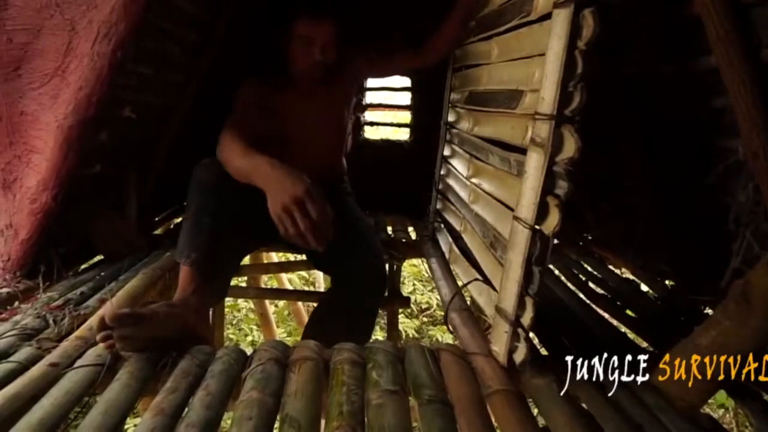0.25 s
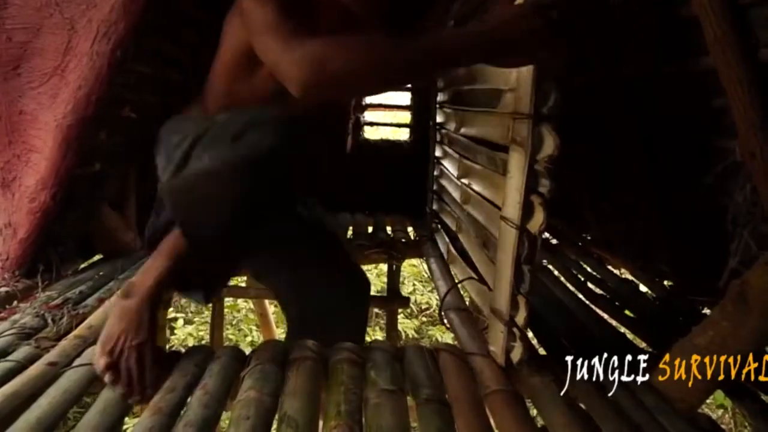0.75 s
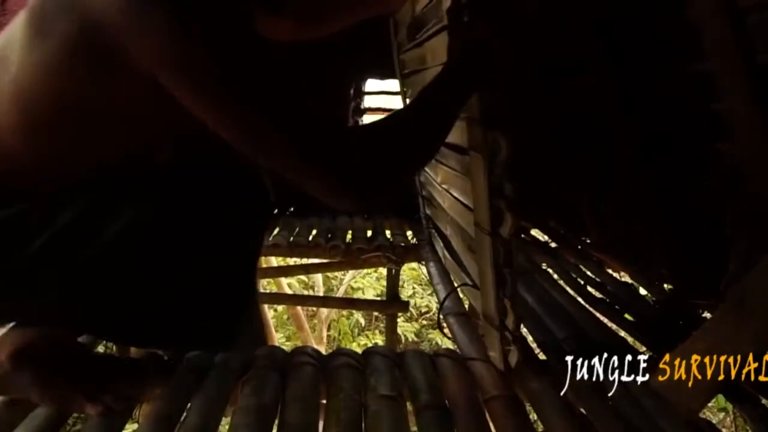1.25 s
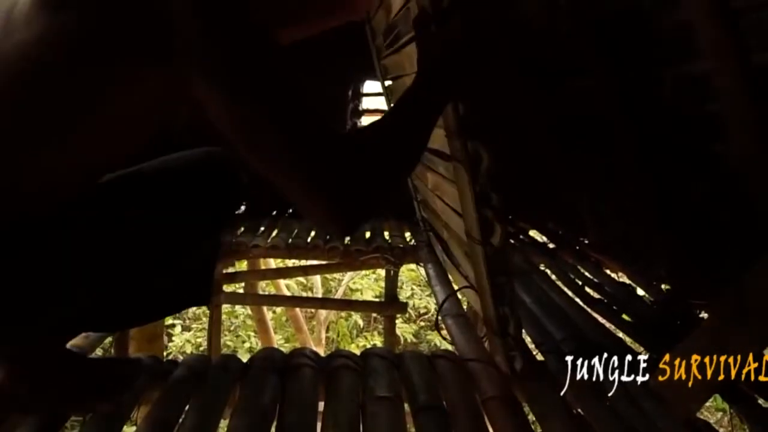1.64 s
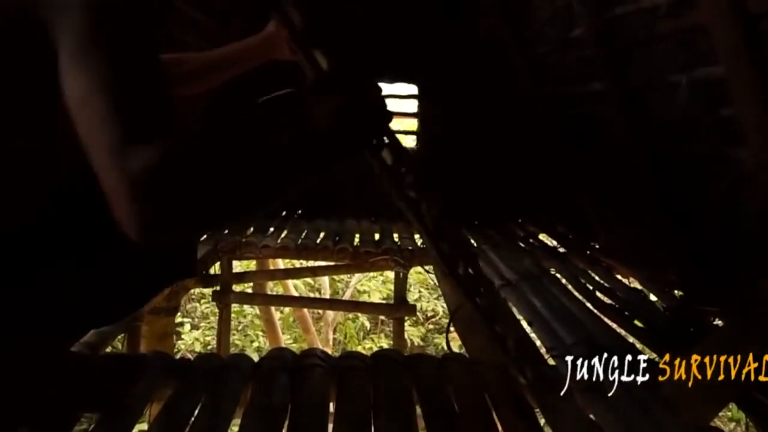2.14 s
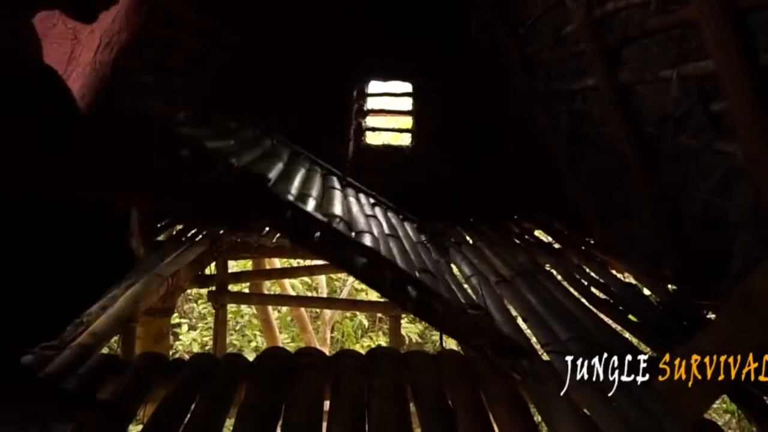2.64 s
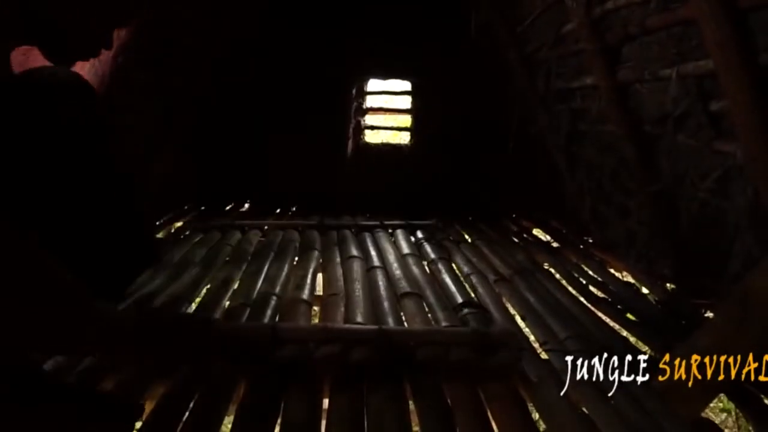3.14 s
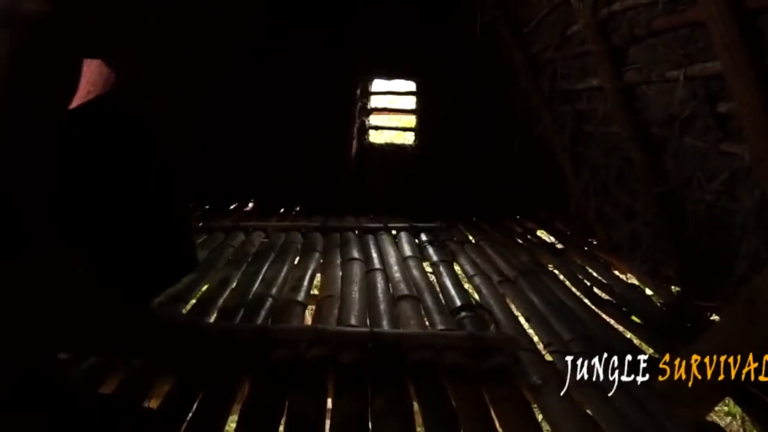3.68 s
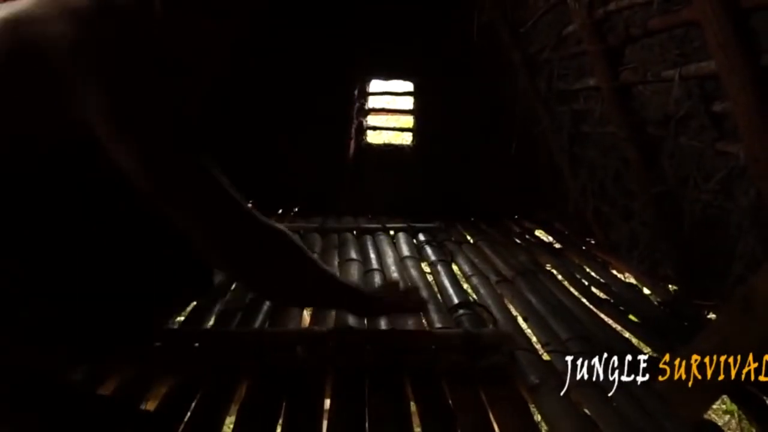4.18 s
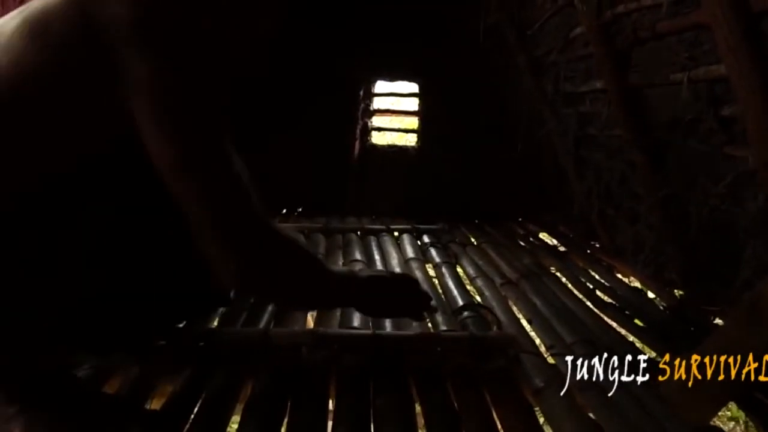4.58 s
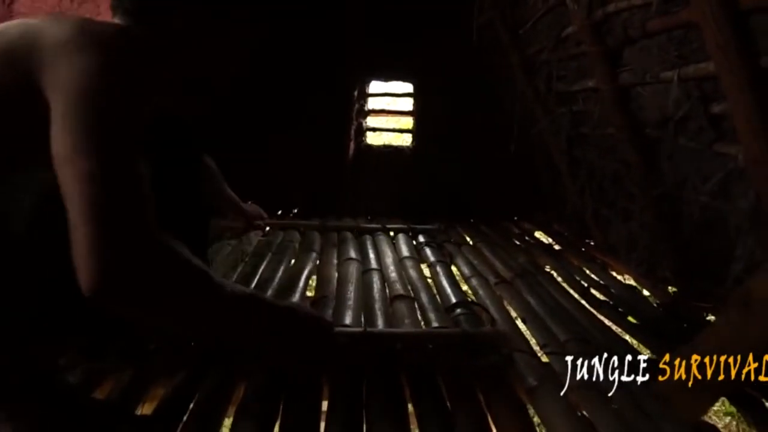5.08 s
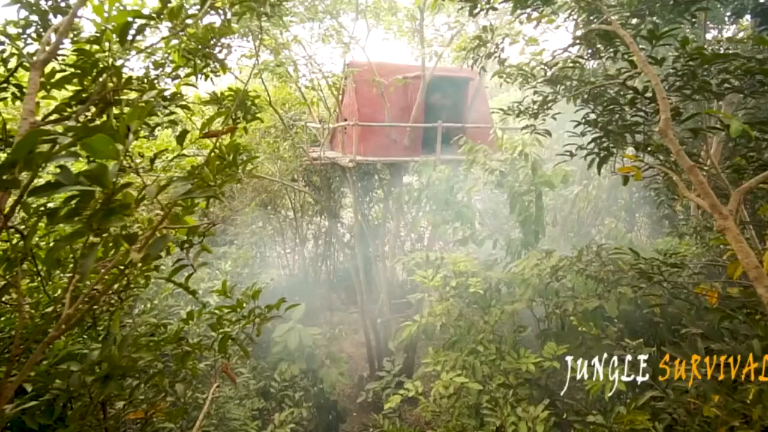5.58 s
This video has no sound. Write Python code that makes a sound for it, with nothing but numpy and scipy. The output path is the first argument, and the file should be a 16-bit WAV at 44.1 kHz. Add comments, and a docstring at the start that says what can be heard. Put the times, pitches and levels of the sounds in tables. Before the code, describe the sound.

Lashed bamboo slats slip and tick against each other, first lightly, then with stronger continuous rubbing as the panel comes down. Three hollow, rattling blows on the poles follow, with soft floor booms; after a short lull come more scrapes and one final hard clatter. The microphone is near, the room tail short and dry, with quiet outdoor hiss and faint early bird whistles.

```python
"""A hatch of lashed bamboo slats is lowered inside a small hut and pressed into a bamboo floor.
Its slats rub, rustle and click (random tiny impacts, filtered by the ringing of bamboo), then
clatter against the poles in four loud knocks (short bursts of impacts). Low pole sounds and soft floor
booms (noise through low, ringing filters) come from feet, a creak and the blows. From outside come a
forest hiss (filtered noise) and faint bird pips (rising sine whistles); the hut adds a short tail."""
import sys
import numpy as np
from scipy import signal
from scipy.fft import rfft, irfft
from scipy.io import wavfile
from scipy.ndimage import uniform_filter1d

SR = 44100
rng = np.random.default_rng(int(sys.argv[2]) if len(sys.argv) > 2 else 0)


def file_out(sig):
    """Save sig as 16-bit WAV at sys.argv[1]."""
    # one column per channel
    cols = np.atleast_2d(sig).T
    # limit, then scale
    lim = np.clip(cols, -1, 1)
    pcm = np.round(lim * 32767).astype(np.int16)
    wavfile.write(sys.argv[1], SR, pcm)


N = 256662  # length in samples
TAPS = 16384  # length of a filter, and of one blow, in samples
HZ = np.fft.rfftfreq(TAPS, 1 / SR)  # the frequencies at which gain curves are drawn

# ways the slat panel likes to ring: [f/Hz, height over the body/dB (before scaling), ring time to -60 dB/s]
PANEL_MODES = [(267, 6, 0.088), (367, 10, 0.15), (430, 7, 0.083), (682, 4, 0.036), (878, 7.5, 0.21),
               (1024, 2.5, 0.032), (1322, 1.5, 0.2), (1575, 2, 0.054), (1790, 2, 0.16), (2026, 5.5, 0.08),
               (2156, 1.5, 0.05), (2310, 4, 0.083), (2567, 6, 0.046), (2735, 6.5, 0.06), (2940, 5.5, 0.073),
               (3130, 3.5, 0.062), (3217, -0.5, 0.033), (3410, -17, 0.089), (3730, 2, 0.15),
               (3960, -3, 0.062)]
# tone of slats slipping past each other: [f/Hz, relative level per Hz/dB]
CLICK_TONE = [(60, -27), (220, -37.5), (420, -19), (900, -8.5), (1500, -4.5), (2500, -2.5), (4000, 1),
              (6500, -6), (10000, -10), (16000, -13.5)]
# stereo width of sounds from straight ahead: [f/Hz, side over mid/dB]
AHEAD = [(60, -50), (150, -38), (380, -20), (950, -11.5), (2380, -8), (5980, -1), (15000, -4)]
# stereo width of sounds from all over the panel: [f/Hz, side over mid/dB]
AROUND = [(100, -8), (250, -9.5), (700, -7.5), (2400, -5.5), (4400, -1), (8000, 0), (15000, -2)]


def amp(db):
    """Turns decibels into a gain."""
    return 10 ** (np.asarray(db) / 20)


def unit(x):
    """Scales a sound to an average (rms) strength of 1."""
    return x / np.sqrt(np.mean(x ** 2) + 1e-20)


def read(points, hz=HZ):
    """Reads a table between its points, on a log-frequency axis."""
    f, value = np.transpose(points)
    return np.interp(np.log(hz + 1), np.log(f + 1), value)


def add(mix, s, sound):
    """Mixes a two-channel sound in at time s."""
    part = mix[:, max(round(s * SR), 0):][:, :sound.shape[1]]
    part += sound[:, :part.shape[1]]


def colour(x, db):
    """Filters with a gain curve, never sounding before its input: sharp peaks ring on after each impact."""
    # folding the cepstrum gives the minimum-phase filter, which responds at once
    cepstrum = irfft(np.maximum(db, db.max() - 100) * np.log(10) / 20)
    cepstrum[1:TAPS // 2] *= 2
    cepstrum[TAPS // 2 + 1:] = 0
    response = irfft(np.exp(rfft(cepstrum)))
    return signal.oaconvolve(x, response[None], axes=1)[:, :x.shape[1]]


def stereo(pair, db, spread=AHEAD):
    """Colours two unrelated signals as mid and side, then scales so that the mid has energy 1."""
    mid = colour(pair[:1], db)[0]
    side = colour(pair[1:], db + read(spread))[0]
    return np.array([mid + side, mid - side]) / np.linalg.norm(mid)


def ring(hz, octaves):
    """Bell-shaped resonance of one struck piece, height 1."""
    return 1 / (1 + (np.log2((HZ + 1) / hz) / octaves) ** 2)


def shelf(hz):
    """Smooth step from 0 below hz to 1 above."""
    return 1 - 1 / (1 + (HZ / hz) ** 6)


def modes_db(modes):
    """Gain curve of a set of ringing modes: the longer the ring, the narrower the peak."""
    power = 1
    for hz, db, t60 in modes:
        half_width = np.log(1000) / (2 * np.pi * t60)  # Hz
        power = power + amp(db) ** 2 / (1 + ((HZ - hz) / half_width) ** 2)
    return 10 * np.log10(power)


def bamboo(body_db, hz, height_db, ripple_db, octaves=0.11):
    """Gain curve of one piece: its main ring, and many lesser modes that differ from piece to piece."""
    rough = rng.standard_normal(len(HZ))
    lesser = unit(uniform_filter1d(uniform_filter1d(rough, size=30), size=22))
    return body_db + height_db * ring(hz, octaves) + ripple_db * lesser * shelf(hz=456)


def hardened(db, treble_db):
    """Harder contacts put a larger share of their power into the treble."""
    power, top = amp(db) ** 2, shelf(hz=4830)
    share_db = 10 * np.log10(np.sum(power * top ** 2) / np.sum(power))
    return db + top * (treble_db - share_db)


def contacts(size, per_s, spread_db, grit):
    """Two random trains of tiny impacts of unequal force, with fine grit between them."""
    strength = amp(spread_db * np.minimum(rng.exponential(1, (2, size)), 4))
    force = strength * rng.choice([-1, 1], (2, size))
    happens = rng.random((2, size)) < per_s / SR
    return unit(force * happens) + grit * rng.standard_normal((2, size))


def rattle(rise, decay, body_db, spread=AHEAD):
    """One blow: a run of impacts builds up to the main one and dies away, heard through the bamboo."""
    t, rise = np.arange(TAPS) / SR, max(rise, 1e-4)
    build_up = np.minimum(t / rise, 1) ** 0.95
    force = build_up * np.exp(-np.maximum(t - rise, 0) / max(decay, 1e-3))
    impacts = contacts(TAPS, per_s=3500, spread_db=2.5, grit=0.62) * force
    impacts[:, force.argmax()] += 2.2  # the main impact
    impacts /= np.linalg.norm(impacts, axis=1, keepdims=True)
    return stereo(impacts, body_db, spread) * np.linalg.norm(force)


def boom(ring_share):
    """The poles go on shaking after a blow and drive the floor's low modes."""
    # modes of the sprung floor: [f/Hz, height/dB (before ring_share), ring time to -60 dB/s]
    floor_modes = [(66, 10, 0.36), (83, 10, 0.4), (123.3, 18, 0.22), (133.3, 6, 0.1)]
    # overall tone of the floor: [f/Hz, relative level per Hz/dB]
    floor_tone = [(25, -26), (60, -8), (130, -5), (200, -6), (320, -2), (700, -81)]
    t = np.arange(TAPS) / SR
    shaking = rng.standard_normal((2, TAPS)) * t * np.exp(-t / 0.013)
    return stereo(shaking, read(floor_tone) + ring_share * modes_db(floor_modes)) * np.sqrt(0.08 * SR)


def swell(t, peak, rise, fall):
    """Gain of one shove: it gathers speed, peaks and slows down."""
    edge_db, roundness = -5.5, 1.55  # level one rise or fall away from the peak; shape of the swell
    away = np.maximum((peak - t) / rise, (t - peak) / fall)
    return amp(edge_db * np.minimum(away, 10) ** roundness)


def friction():
    """Gains of rustle, rubbing and scraping: the shoves, and the slowly rising and falling drag between them."""
    # shoves of the panel, before the layer levels in sliding():
    # [peak t/s, rise/s, fall/s, rubbing level/dB, dry rustle over rubbing/dB]
    strokes = [(.17, 0.048, 0.099, -53.5, -3.5), (.41, 0.041, 0.11, -50.5, -7),
               (.492, 0.012, 0.011, -40, -6.5), (0.619, 0.018, 0.026, -52, 5),
               (.75, 0.046, 0.054, -45.5, 0.5), (0.841, 0.026, 0.043, -49.5, 4),
               (0.921, 0.024, 0.03, -45.5, -5.5), (1.01, 0.062, 0.088, -54, -3.5),
               (1.18, 0.038, 0.043, -47, 0.5), (1.35, 0.11, .11, -46, 2.5),
               (1.568, 0.014, 0.028, -36.5, -3.5), (1.64, .025, 0.039, -43, -6),
               (1.812, 0.049, 0.028, -51, 4), (1.94, 0.11, 0.11, -51, -6), (2.06, 0.03, 0.049, -46.5, -2),
               (2.162, 0.031, .025, -47, -0.5), (2.35, 0.079, 0.17, -47.5, -3.5),
               (2.5, 0.051, 0.052, -52.5, 3.5), (2.625, 0.055, 0.053, -41.5, 2),
               (2.74, 0.018, 0.02, -43, -6), (2.869, 0.064, 0.055, -41.5, -4),
               (3.015, 0.068, 0.033, -40.5, -8), (3.219, 0.078, 0.046, -39.5, -6.5),
               (3.38, 0.09, 0.09, -42.5, -14), (3.482, 0.039, 0.039, -48.5, -2),
               (3.609, 0.019, 0.023, -40.5, -14), (3.73, 0.054, 0.025, -39.5, -10),
               (3.977, 0.014, 0.022, -42.5, -16), (4.499, 0.033, 0.052, -44.5, 2.5),
               (4.641, 0.016, 0.021, -42, -6), (4.87, 0.042, 0.023, -56, 2), (4.95, 0.031, 0.038, -63, 8),
               (5.01, 0.013, 0.015, -46, 0.5), (5.06, 0.026, 0.028, -37.5, -6),
               (5.14, .025, 0.021, -44, -10), (5.27, 0.04, 0.17, -46.5, -5.5),
               (5.586, 0.018, 0.02, -40, -9), (5.64, 0.031, 0.12, -60, 6.5)]
    # the panel's weight dragging on the poles between shoves: [t/s, level before the layer levels/dB]
    drag = [(0, -71.5), (.9, -70), (1.2, -54), (1.5, -70), (1.9, -60.5), (2.25, -59.5), (2.76, -65),
            (2.9, -61), (3.08, -60.5), (3.3, -51), (3.55, -65.5), (3.72, -60.5), (4.1, -65.5),
            (4.27, -69.5), (4.45, -61), (4.85, -62), (5.15, -55), (5.82, -71)]
    drag_share_db = np.array([[-3.5], [-4.5], [0]])  # rustle, rubbing, scraping
    stroke_scrape_db = -22.5  # scraping relative to the rubbing of a shove
    t = np.arange(0, N / SR + .01, .002)
    power = amp(np.interp(t, *np.transpose(drag)) + drag_share_db) ** 2
    for peak, rise, fall, db, dry_db in strokes:
        levels_db = [[db + dry_db], [db], [db + stroke_scrape_db]]
        power += (amp(levels_db) * swell(t, peak, rise, fall)) ** 2
    return [np.interp(np.arange(N) / SR, t, np.sqrt(p)) for p in power]


def rubbing(body_db, per_s, clump_db, ripple_db, count):
    """Several slats catch and slip with ever-changing grip, each in its own colour."""
    out = np.zeros((2, N))
    beats = np.arange(0, N, SR / 45)  # the grip changes 45 times a second
    for hz in np.geomspace(2000, 4800, count):
        wander = np.clip(rng.standard_normal(len(beats)), -2, 2)
        grip = amp(clump_db * np.interp(np.arange(N), beats, wander))
        slips = contacts(N, per_s, spread_db=2.4, grit=0.6) * grip
        out += stereo(slips, bamboo(body_db, hz, height_db=1, ripple_db=ripple_db), spread=AROUND)
    return unit(out)


def sliding():
    """Friction: fine dry fibres rustle and snap, slat edges rub, and the hollow poles scrape."""
    # tones of the three kinds of friction, each: [f/Hz, relative level per Hz/dB]
    rustle_tone = [(100, -40), (400, -10.5), (1500, -5), (4000, 2.5), (7000, 0.5), (11000, -1),
                   (16000, -3.5)]
    rub_tone = [(200, -46), (900, -5.5), (1600, -3), (2500, 1), (4000, 0), (6000, -12), (12000, -53)]
    scrape_tone = [(40, -42), (110, -9), (210, -22), (400, -1), (650, 4), (1050, -4.5), (1800, -11.5),
                   (4000, -16.5)]
    rustle_gain, rub_gain, scrape_gain = friction()
    panel_db = modes_db(PANEL_MODES)
    rustle = rubbing(read(rustle_tone), per_s=1500, clump_db=4.5, ripple_db=2.5, count=4)
    rub = rubbing(read(rub_tone) + 0.5 * panel_db, per_s=150, clump_db=4.5, ripple_db=5, count=6)
    scrape = rubbing(read(scrape_tone) + 0.54 * panel_db, per_s=280, clump_db=5.0, ripple_db=3.5, count=3)
    # stray fibres snapping while the slats rub
    snaps = contacts(N, per_s=38, spread_db=1.0, grit=0.001)
    snap_tone = bamboo(read(CLICK_TONE), hz=3540, height_db=-5, ripple_db=7)
    crackle = unit(stereo(snaps, snap_tone, spread=AROUND))
    edges = (amp(0.52) * rub + amp(-10.5) * crackle) * rub_gain
    return amp(5.0) * rustle * rustle_gain + edges + amp(1.5) * scrape * scrape_gain


def forest():
    """Steady distant hiss of leaves and insects, made of filtered noise."""
    # tone of the hiss: [f/Hz, relative level per Hz/dB]
    hiss_tone = [(18, -53), (30, -22), (98, -13.5), (194, -22.5), (540, -14), (844, -6), (1160, -1),
                 (1630, -7), (2060, -1.5), (5740, -6.5), (13700, -10), (16000, -11)]
    hiss = stereo(rng.standard_normal((2, N)), read(hiss_tone), spread=AROUND)
    return amp(-61.0) * np.sqrt(N) * hiss


def clicks():
    """A slat sticks, slips free and rings at its own pitch: the shorter the slip, the purer the ring."""
    # slats slipping past each other:
    # [t/s, level before level_db/dB, decay/s, slat pitch f/Hz, share of power in the treble/dB]
    slips = [(.092, -30.5, 0.0037, 4730, -2.5), (0.104, -32.5, 0.0099, 4670, -3.5),
             (.152, -44.5, 0.0062, 5800, -2), (.376, -45, 0.0075, 3530, -5.5),
             (0.498, -35, 0.0092, 2450, -15), (.739, -30, 0.0095, 3960, -13),
             (0.788, -27.5, 0.0073, 3380, 4), (0.969, -38.5, 0.014, 3670, -2),
             (.985, -36.5, 0.015, 4550, -14), (1.104, -42.5, 0.011, 1820, -14.5),
             (1.163, -30, 0.0078, 3700, -20.5), (1.395, -22, 0.0034, 3970, -2),
             (1.428, -39.5, 0.011, 3200, -16), (1.488, -37, 0.022, 2720, -5.5),
             (1.646, -34.5, .008, 3170, -10), (2.3, -40.5, 0.011, 3670, -8.5),
             (2.455, -38, 0.029, 2160, -1), (2.547, -30, 0.0084, 3650, -7), (2.967, -30.5, 0.01, 3050, -14),
             (3.166, -38, 0.013, 3000, -12), (3.215, -31, 0.02, 2970, -6.5),
             (3.801, -38, 0.074, 2000, -11.5), (3.949, -39.5, 0.011, 3190, -10.5),
             (4.124, -50.5, 0.01, 2400, -11), (4.465, -35.5, 0.016, 3130, -18),
             (4.659, -38, 0.0061, 2780, -1.5), (4.834, -47.5, 0.012, 2780, -23.5),
             (4.963, -43, 0.0095, 2460, -12.5), (5.115, -32, 0.009, 2570, -13),
             (5.15, -35.5, 0.028, 3470, -7), (5.247, -32, 0.019, 2100, 0.5), (5.282, -29.5, 0.006, 9000, 6),
             (5.502, -32, 0.0055, 2460, -6), (5.55, -38, 0.0077, 4080, 0)]
    rise_s, softening, level_db = 0.0016, 0.6, 0.82  # softening: duller slips build up more slowly
    snap_s, snap_ring_db = 0.007, 18.5  # slips longer than snap_s ring far less at one pitch
    out = np.zeros((2, N))
    body = read(CLICK_TONE) + 0.89 * modes_db(PANEL_MODES)
    for s, db, decay, hz, treble_db in slips:
        rise = rise_s * amp(-softening * treble_db)
        height_db = snap_ring_db / (1 + (decay / snap_s) ** 2)
        tone = hardened(bamboo(body, hz, height_db, ripple_db=3.5, octaves=0.21), treble_db)
        add(out, s - rise, amp(db + level_db) * rattle(rise, decay, tone, spread=AROUND))
    return out


def bird():
    """Short, slightly rising whistles from far away, each a sine that swells and fades."""
    # a far bird: [start t/s, length/s, middle f/Hz, level/dB]
    pips = [(.235, .05, 4060, -57), (1.185, .04, 4560, -50), (1.725, .05, 4100, -55),
            (2.28, .04, 5060, -54)]
    out = np.zeros((2, N))
    for s, length, hz, db in pips:
        u = np.linspace(0, 1, round(length * SR))  # 0 at the start of the pip, 1 at its end
        pitch = hz * (1 + 0.025 * (u - .5))
        whistle = np.sin(2 * np.pi * np.cumsum(pitch) / SR) * np.sin(np.pi * u) ** 2
        add(out, s, amp(db) * np.tile(whistle, (2, 1)))
    return out


def thuds():
    """Low pole sounds, each a burst of impacts through a pole's low ring, with the floor booming under it."""
    # foot thuds, a short two-pitch creak near 2.85 s, and the hollow ring under the last knock:
    # [start t/s, level/dB, rise/s, decay/s, pole pitch f/Hz, height of that ring/dB, floor boom level/dB]
    pole_sounds = [(1.566, -39.5, 0.0041, 0.012, 430, 9, -75), (1.583, -22.5, 0.004, 0.0066, 745, 9.5, -54),
                   (2.048, -47.5, 0.0071, 0.026, 414, 10, -65), (2.626, -44, 0.006, 0.022, 350, 4, -75),
                   (2.84, -48, 0.0075, 0.029, 643, 30, -93), (2.864, -48.5, 0.017, 0.012, 892, 31, -90),
                   (3.24, -45, 0.0099, 0.055, 524, -3, -60), (5.342, -24.5, 0.0027, 0.0037, 428, 16.5, -66)]
    # tone of a pole: [f/Hz, relative level per Hz/dB]
    pole_tone = [(40, -37), (120, -48), (200, -17), (300, -7.5), (500, -0.5), (750, -0.5), (1100, -2.5),
                 (1600, -12.5), (3500, -12), (8000, -39)]
    out = np.zeros((2, N))
    for s, db, rise, decay, hz, height_db, boom_db in pole_sounds:
        tone = bamboo(read(pole_tone), hz, height_db, ripple_db=1.5)
        add(out, s, amp(db) * rattle(rise, decay, tone))
        add(out, s, amp(boom_db) * boom(ring_share=1.37))
    return out


def knocks():
    """The panel lands slat after slat; each blow rings the bamboo and shakes the floor."""
    # slats landing on the poles:
    # [t/s, level before level_db/dB, decay/s, slat pitch f/Hz, share of power in the treble/dB]
    landings = [(3.28, -34, 0.016, 1290, -32), (3.354, -27, 0.019, 2390, -7),
                (3.364, -18, 0.0025, 2780, -12), (3.369, -16.5, 0.012, 2970, -14.5),
                (3.378, -22, 0.024, 880, -21), (3.831, -17.5, 0.0095, 1130, -16.5),
                (3.84, -23.5, 0.016, 2670, -27), (3.855, -20.5, 0.0085, 3360, -22.5),
                (4.3, -19, 0.019, 2400, -12), (4.315, -19, .014, 960, -18.5),
                (4.345, -28, 0.015, 2220, -13.5), (5.262, -24, 0.019, 1830, -21),
                (5.307, -30, 0.095, 2510, -11.5), (5.342, -15, 0.023, 2800, -13),
                (5.351, -13.5, 0.0063, 2510, -12), (5.362, -14.5, .025, 2630, -14.5),
                (5.398, -18.5, 0.02, 2340, -21), (5.414, -19.5, 0.015, 2580, -19)]
    # tone of a landing slat: [f/Hz, relative level per Hz/dB]
    knock_tone = [(30, -38), (80, -6.5), (200, -23), (380, -9.5), (540, -7), (900, -1), (1450, 1),
                  (2600, 0.5), (3800, 2.5), (5500, -8), (8000, -14), (16000, -23)]
    rise_s, ring_db, level_db = 0.0035, 5.5, -1  # build-up; height of the struck slat's own ring; trim
    boom_db = -38.5  # floor boom relative to the listed level of the blow
    # the first blow after a pause builds up slowly as the slack is taken up
    first_rise_s, pause_s = 0.008, 0.06
    out, last = np.zeros((2, N)), 0
    body = read(knock_tone) + modes_db(PANEL_MODES)
    for s, db, decay, hz, treble_db in landings:
        rise = first_rise_s if s - last > pause_s else rise_s
        last = s
        tone = hardened(bamboo(body, hz, ring_db, ripple_db=3.0), treble_db)
        add(out, s - rise, amp(db + level_db) * rattle(rise, decay, tone))
        add(out, s, amp(db + boom_db) * boom(ring_share=1.0))
    return out


def hut(x):
    """Short diffuse tail of the small room: fading noise whose bass lingers longest."""
    # how long the room rings: [f/Hz, time to -60 dB/s]
    fade_times = [(100, 0.52), (500, 0.3), (1500, 0.16), (4000, 0.037), (12000, 0.071)]
    hz, t, z = signal.stft(rng.standard_normal((2, SR // 2)), SR, nperseg=256)
    fade = amp(-60 * t / read(fade_times, hz)[:, None])
    tail = signal.istft(z * fade, SR, nperseg=256)[1]
    tail *= 1 - np.exp(-np.arange(tail.shape[1]) / SR / 0.002)  # soft start
    return signal.fftconvolve(x.mean(0)[None], stereo(tail, -4 * shelf(hz=5000)), axes=1)[:, :N]


def scene():
    """All the bamboo sounds and the bird, with the hut's tail on single events, over the forest."""
    events = knocks() + clicks() + thuds() + bird()
    return events + amp(-15.0) * hut(events) + sliding() + forest()


def record(dry):
    """Cuts off the highest treble with a steep low-pass filter."""
    low_pass = signal.firwin(511, 16250, window=("kaiser", 9), fs=SR)  # edge at 16250 Hz
    return signal.oaconvolve(dry, low_pass[None], "same")


dry = scene()
out = record(dry)
file_out(out)
```